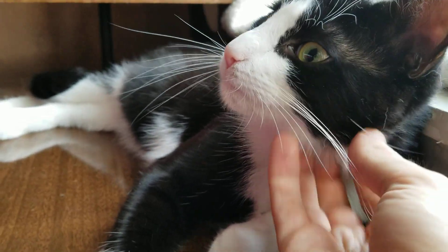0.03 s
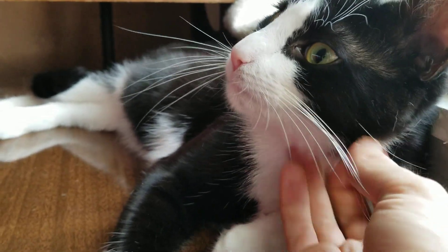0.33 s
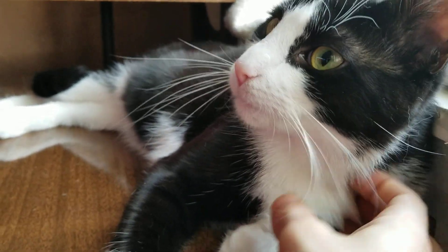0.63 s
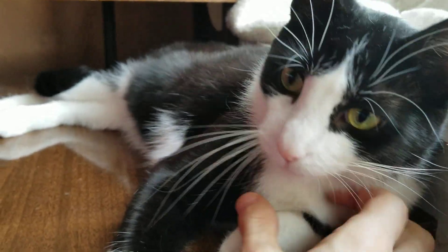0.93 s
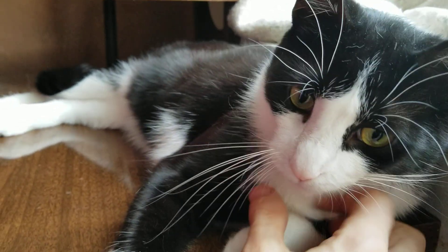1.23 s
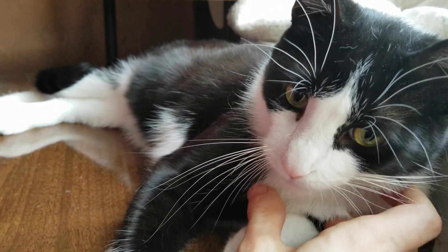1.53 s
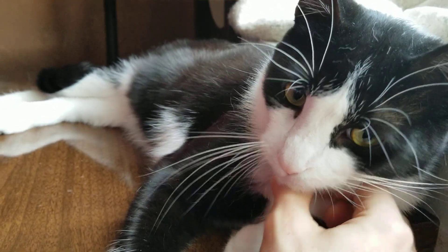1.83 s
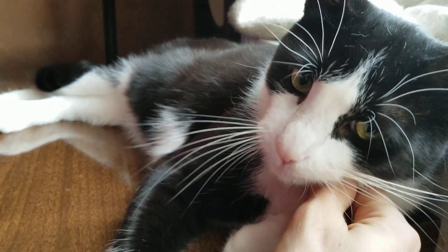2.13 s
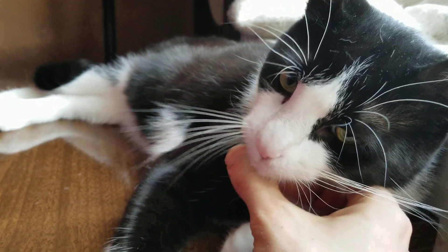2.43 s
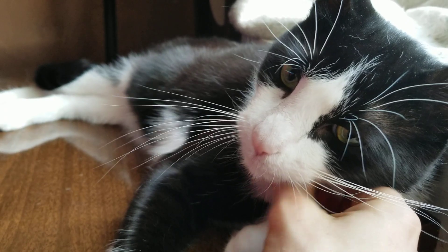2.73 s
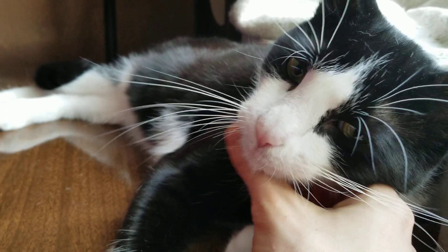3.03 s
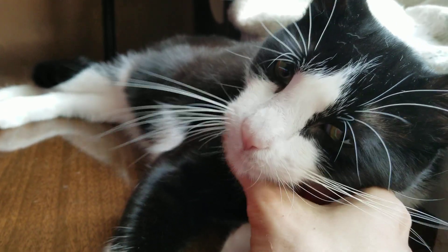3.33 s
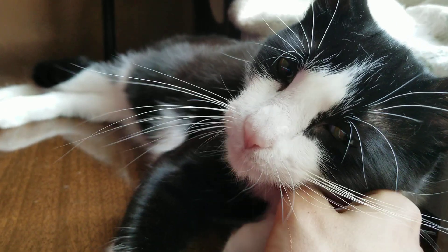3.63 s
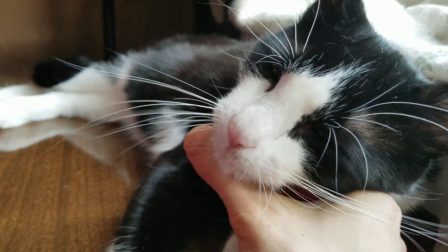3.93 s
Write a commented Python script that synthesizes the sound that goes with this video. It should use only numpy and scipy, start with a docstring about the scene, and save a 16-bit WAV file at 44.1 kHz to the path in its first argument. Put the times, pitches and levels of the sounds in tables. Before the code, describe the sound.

Soft rustling of a hand stroking a cat's fur, close on the left: light touches, one longer slide, then quicker strokes. Behind it in the quiet room are an appliance hum, a low rumble and a distant engine.

```python
"""Light touches rustle in a cat's fur, close to the left microphone, as a hand strokes its cheek and chin.
One long slide under the chin follows, then about four thumb strokes a second. Hairs slipping under
the fingers make tiny impulses that merge into a bright hiss; firmer contact adds a dull rub.
In the quiet room behind, an appliance hums, a distant engine slowly gathers speed,
two deep tones beat over a low rumble, and the microphones hiss."""
import sys
import numpy as np
from scipy.fft import rfft, irfft
from scipy.io import wavfile

SR = 44100
rng = np.random.default_rng(int(sys.argv[2]) if len(sys.argv) > 2 else 0)


def to_wav(sig):
    """Store sig (one row per channel, or 1-D mono) as 16-bit WAV at the path in sys.argv[1].

    Samples outside -1..1 are clipped; the rate is SR.
    """
    pcm = np.clip(np.atleast_2d(sig), -1, 1) * 32767
    pcm = np.round(pcm).astype(np.int16)
    wavfile.write(sys.argv[1], SR, pcm.T)  # frames by channels


N = 176400
TIME = np.arange(N) / SR
FREQS = np.maximum(np.arange(N // 2 + 1) * SR / N, 1)


def strokes(gain_db=5, pivot_hz=12100):
    """Friction noise: each stroke raises a rustle of slipping hairs under slightly uneven pressure."""
    # strokes: start t/s, rise t/s, fall t/s, relative level/dB, tilt/(dB per octave)
    touches = [(.055, 0.034, 0.13, -76.5, -5.5), (.28, 0.14, 0.18, -75, 6), (.6, 0.17, 0.61, -77.5, 1),
               (.95, .25, .3, -84, 1), (1.36, 0.066, 0.36, -79, 2), (1.62, 0.088, .5, -80.5, -7),
               (1.97, .035, 0.61, -78, 4), (2.29, 0.07, 0.25, -75, -1.5), (2.525, 0.065, 0.23, -70.3, 4),
               (2.73, 0.1, 0.46, -72.5, 0.5), (3.005, 0.073, .26, -69.5, 0.5),
               (3.23, 0.13, 0.2, -69.5, 0.5), (3.495, 0.074, 0.16, -68, 0.5),
               (3.61, 0.097, 0.19, -85.5, -10), (3.72, .15, .28, -71.5, -2)]
    # spectrum of the fur: f/Hz, relative level/dB
    fur_spectrum = [(3000, -20.5), (4600, -22.5), (5600, -6.5), (6600, -1), (7300, -8), (8600, -13),
                    (10000, -4), (11300, -0.5), (13500, -1), (15700, -0.5)]
    rustle = rfft([hairs(), hairs()]) * from_db(over_hz(fur_spectrum))
    octaves = np.log2(FREQS / pivot_hz).clip(-2, 1)
    stroking = sum(from_db(db) * swell(start, rise, fall) * irfft(rustle * from_db(tilt * octaves), N)
                   for start, rise, fall, db, tilt in touches)
    pressure = from_db(gain_db + drift(hz=15))
    return pan(db=18) * pressure * stroking / irfft(rustle, N).std()


def slide():
    """Sliding friction along the lie of the fur gives a narrower, lower hiss."""
    # long slide under the chin: t/s, level/dB
    envelope = [(0, -100), (.3, -86.5), (.42, -80), (.62, -86), (.8, -76.5), (1.05, -72.5), (1.17, -73.5),
                (1.3, -72.5), (1.37, -79.5), (1.49, -73), (1.6, -76), (1.84, -74), (1.94, -81.5),
                (2.06, -100), (4, -110)]
    # its spectrum: f/Hz, relative level/dB
    spectrum = [(3500, -16), (4450, -22), (4850, -5), (5200, -7), (5700, -4.5), (6300, 0), (7000, -5.5),
                (7800, -11.5), (8300, -18.5), (11000, -13)]
    level_db, = in_time(envelope)
    gain = from_db(level_db + 1.1 * drift(hz=30))
    return pan(db=19.5) * gain * colour(hairs(), from_db(over_hz(spectrum)))


def swishes():
    """Resonance narrows the friction noise to brief, thin, fluttering swishes."""
    # start t/s, rise t/s, fall t/s, centre f/Hz, width f/Hz, level/dB, left minus right/dB
    bands = [(.88, 0.14, .27, 7814, 1300, -76.5, 22), (1.68, .11, .2, 9100, 2000, -78, 24),
             (1.69, 0.15, .24, 5680, 450, -78, 25), (2.885, 0.11, 0.096, 2790, 200, -77.5, 8),
             (3.895, 0.057, .5, 6000, 423, -65.5, 31), (3.91, 0.12, .2, 7340, 1810, -67, 28),
             (3.88, 0.13, .2, 2560, 454, -82, 9)]
    return sum(pan(pan_db) * from_db(db + 2.5 * drift(hz=60))
               * swell(start, rise, fall) * resonance(hz, width_hz)
               for start, rise, fall, hz, width_hz, db, pan_db in bands)


def rubs():
    """Friction on the skin under the chin: firmer contact adds a soft, low rub on both sides."""
    # start t/s, rise t/s, fall t/s, centre f/Hz, width f/Hz, level/dB
    bands = [(.75, 0.47, 0.7, 470, 262, -78), (1.4, 0.28, 0.46, 597, 210, -81.5),
             (3.1, 0.11, .2, 1075, 240, -87), (3.3, 0.34, 0.69, 480, 283, -83.5),
             (3.87, 0.087, .3, 1070, 302, -82)]
    return sum(from_db(db + 1.3 * drift(hz=44)) * swell(start, rise, fall) * resonance(hz, width_hz)
               for start, rise, fall, hz, width_hz, db in bands)


def hairs(slips_per_s=12000, spread_db=2.5):
    """Shot noise: hairs slip free at random instants, in tiny clicks of uneven size."""
    slips = rng.random(N) < slips_per_s / SR
    signs = rng.choice([-1, 1], N)
    return slips * signs * from_db(spread_db * np.minimum(rng.exponential(1, N), 4))


def resonance(hz, width_hz):
    """A resonance passes one band of the hairs' clicks; rms 1."""
    return colour(hairs(), 1 / (1 + ((FREQS - hz) / (width_hz / 2)) ** 2))


def swell(start, rise, fall):
    """Amplitude envelope of a touch: a finger presses in smoothly and eases off."""
    press = np.sin(np.pi / 2 * np.clip((TIME - start) / rise, 0, 1)) ** 1.3
    release = np.clip(1 - (TIME - start - rise) / fall, 0, 1) ** 2.25
    return press * release


def engine():
    """Transmission loss: walls let through only a far engine's low orders; the lowest swells most."""
    # engine run: t/s, firing rate f/Hz, base level/dB
    run = [(0, 59.85, -58), (.6, 61.6, -63.5), (1.3, 63.02, -60.5), (1.9, 62.36, -63.5), (2.6, 64.34, -55),
           (3.1, 66.2, -56), (3.6, 68.2, -54), (3.87, 69.15, -48.5), (4, 69.96, -45)]
    # multiple of the firing rate, relative level/dB, share of the level's swing
    orders = [(1, 2, 0.97), (1.5, -7.5, 0.51), (2, -3, 0.32)]
    firing_hz, level_db = in_time(run)
    cycles = np.cumsum(firing_hz) / SR
    mean_db = level_db.mean()
    swing_db = level_db - mean_db
    return sum(from_db(mean_db + db + share * swing_db + 2 * drift(hz=11)) * sine(order * cycles)
               for order, db, share in orders)


def hum(drone_hz=94.72, octave_db=-21.5):
    """Periodic vibration of an appliance: wavering tones and a swelling drone with a faint octave."""
    # steady tones: f/Hz, level/dB, waver/dB
    tones = [(119.75, -55, 1), (160.5, -75, -1.5), (272.4, -82, 6)]
    # swell of the drone: t/s, level/dB
    envelope = [(0, -61.5), (1.0, -61), (1.4, -54), (2.0, -54), (2.15, -61.5), (2.44, -46), (2.75, -58),
                (3.05, -61), (4, -64)]
    drone_db, = in_time(envelope)
    steady = sum(from_db(db + waver_db * drift(hz=1.5)) * sine(hz * TIME) for hz, db, waver_db in tones)
    drone = sine(drone_hz * TIME) + from_db(octave_db) * sine(2 * drone_hz * TIME)
    return steady + from_db(drone_db) * drone


def throb():
    """Beating: two deep tones close in frequency interfere in a throb that recedes and returns."""
    # each tone's swell: t/s, level/dB
    envelope = [(0, -60.5), (.9, -59), (1.5, -61), (2.15, -68), (2.6, -62), (3.3, -61.5), (4, -61)]
    # the beating pair: f/Hz
    pair = [42.73, 48.1]
    level_db, = in_time(envelope)
    return pan(db=1.5) * sum(from_db(level_db + 1.2 * drift(hz=3.3)) * sine(hz * TIME) for hz in pair)


def room_rumble(level_db=-55.5):
    """Interchannel coherence: the room's noise is most alike on both sides in the bass."""
    # rumble: f/Hz, relative level/dB
    spectrum = [(20, -24.5), (32, -9.5), (42, -4), (62, -2.5), (78, -5), (100, 3.5), (130, 0), (148, -6.5),
                (175, -15), (192, -10), (220, -20.5), (265, -15), (310, -14), (390, -28), (470, -28),
                (600, -34.5), (1000, -42), (3000, -66.5)]
    # balance: f/Hz, left minus right/dB
    balance = [(40, 2), (100, -2.3), (280, -2.5), (700, -1.5)]
    # likeness of the two sides: f/Hz, coherence
    likeness = [(30, 0.87), (130, 0.82), (200, 0.71), (300, 0.51), (500, 0.37), (1000, .2), (3000, 0.057)]
    coherence = over_hz(likeness)
    mid = rfft(white()) * np.sqrt(1 + coherence)
    side = rfft(white()) * np.sqrt(1 - coherence)
    lean = from_db(over_hz(balance) / 2)
    channels = np.array([(mid + side) * lean, (mid - side) / lean])
    return from_db(level_db) * rms_one(irfft(from_db(over_hz(spectrum)) * channels, N))


def microphone_hiss(level_db=-73):
    """Self-noise: each microphone adds its own uncorrelated hiss."""
    # hiss: f/Hz, relative level/dB
    spectrum = [(300, -1), (1300, 1), (1800, -1.5), (2700, -2.5), (3800, -7.5), (6000, -8.5), (7500, -13.5),
                (9300, -18.5), (10600, -7), (12300, -1), (15700, -1.5)]
    hiss = colour(np.array([white(), white()]), from_db(over_hz(spectrum)))
    return from_db(level_db) * pan(db=0.6) * hiss


def from_db(db):
    """Decibels to amplitude ratio."""
    return 10 ** (np.asarray(db) / 20)


def rms_one(x):
    """Normalisation to unit rms."""
    return x / np.sqrt(np.mean(x ** 2) + 1e-20)


def in_time(rows):
    """Linear interpolation of each column at every sample."""
    times, *columns = np.transpose(rows)
    return [np.interp(TIME, times, column) for column in columns]


def over_hz(points):
    """Interpolation over log frequency at every bin."""
    hz, values = np.transpose(points)
    return np.interp(np.log(FREQS), np.log(hz), values)


def colour(x, gain):
    """Spectral shaping by a gain per bin; rms 1."""
    return rms_one(irfft(rfft(x) * gain, N))


def white():
    """Gaussian white noise."""
    return rng.standard_normal(N)


def drift(hz):
    """Random modulation: noise low-passed at hz; rms 1."""
    return colour(white(), 1 / (1 + (FREQS / hz) ** 4))


def sine(cycles):
    """A pure tone with random starting phase; rms 1."""
    return np.sqrt(2) * np.sin(2 * np.pi * (cycles + rng.random()))


def pan(db):
    """Left and right gains for a level difference, at constant power."""
    return rms_one(from_db(np.array([[db], [-db]]) / 2))


def scene():
    """Superposition of the hand in the fur and the sounds of the room."""
    hand = strokes() + slide() + swishes() + rubs()
    return hand + pan(db=1.6) * engine() + hum() + throb() + room_rumble() + microphone_hiss()


def record(dry, cutoff_hz=15740, fade_s=.004):
    """Band limiting: a steep low-pass cuts the top treble; both ends fade briefly."""
    to_edge_s = np.minimum(TIME, TIME[::-1])
    fade = np.sin(np.pi / 2 * np.clip(to_edge_s / fade_s, 0, 1)) ** 2
    return irfft(rfft(dry * fade) / np.sqrt(1 + (FREQS / cutoff_hz) ** 900), N)


dry = scene()
out = record(dry)
to_wav(out)
```